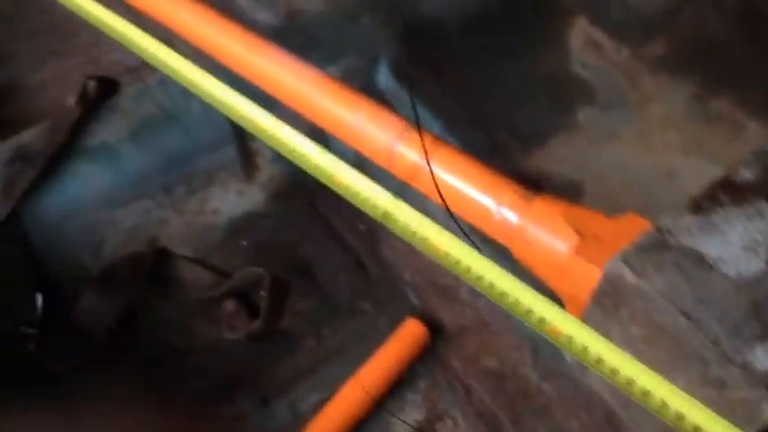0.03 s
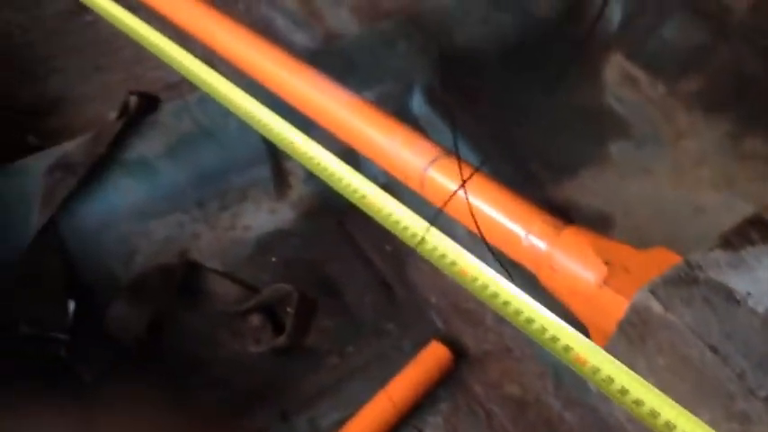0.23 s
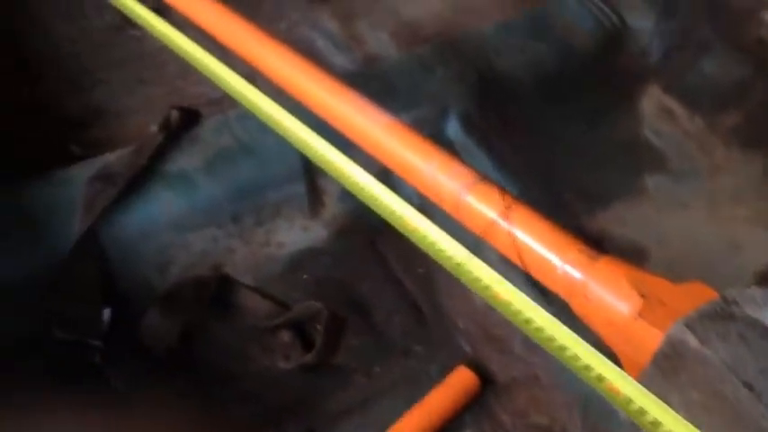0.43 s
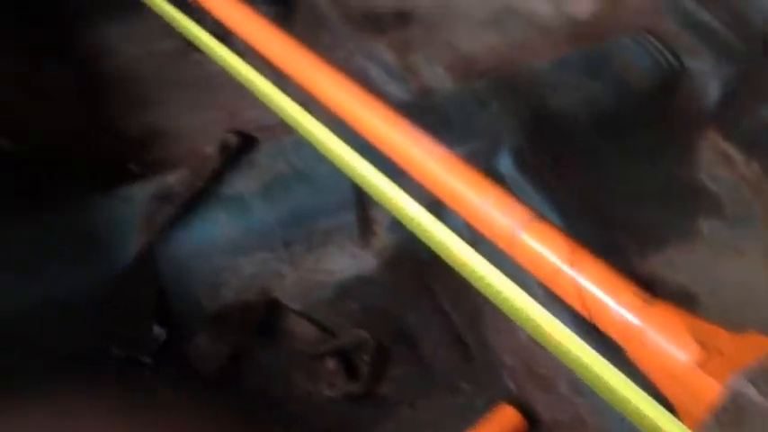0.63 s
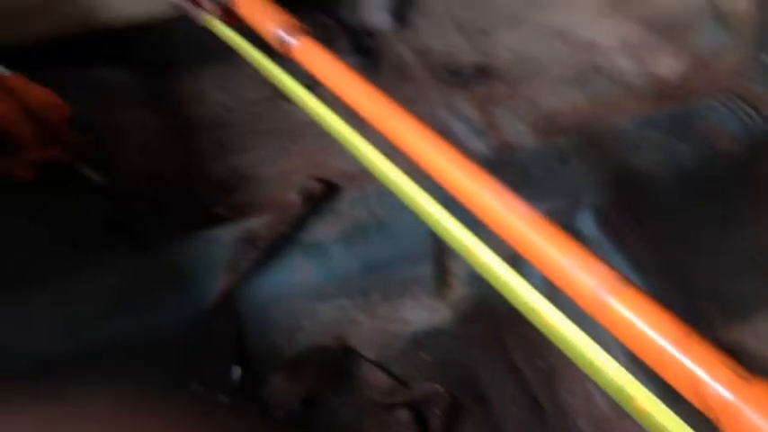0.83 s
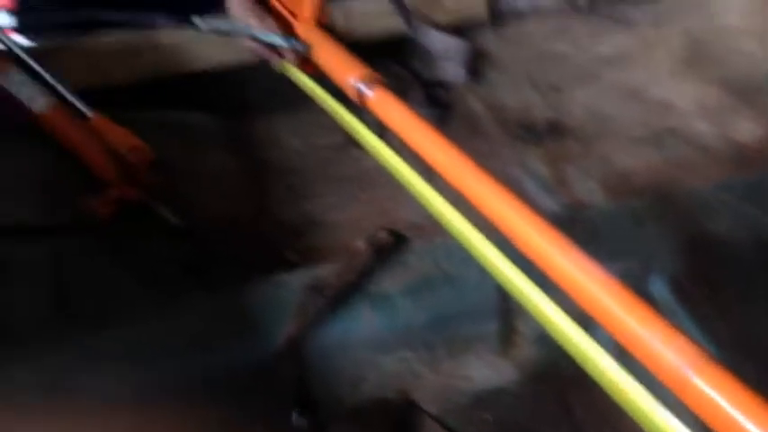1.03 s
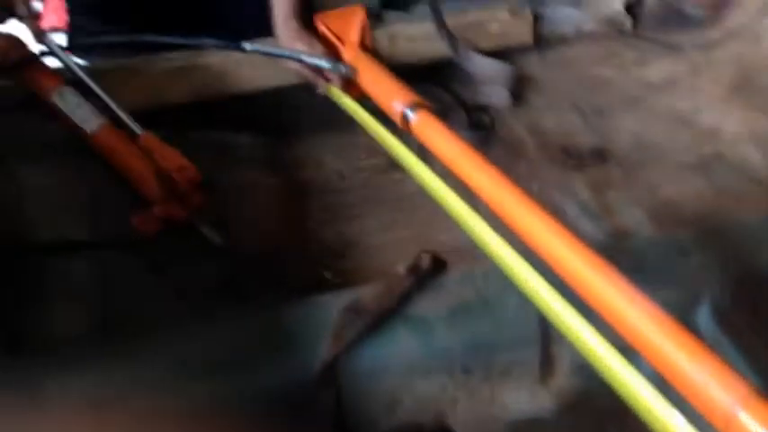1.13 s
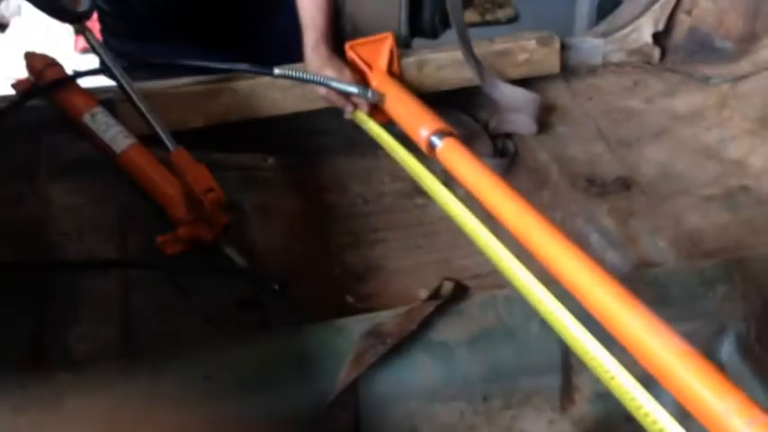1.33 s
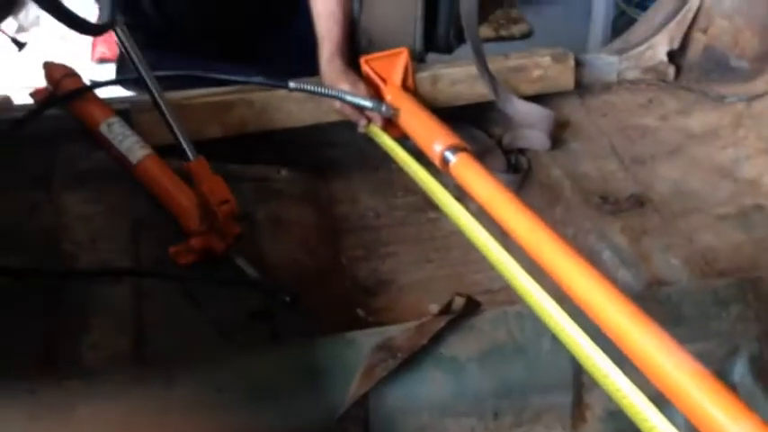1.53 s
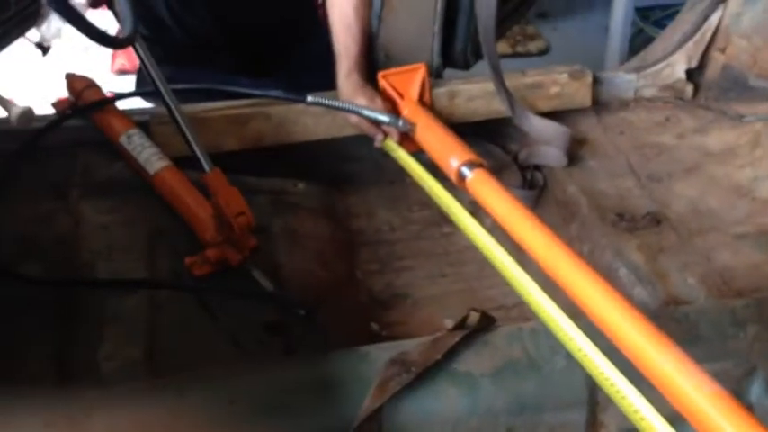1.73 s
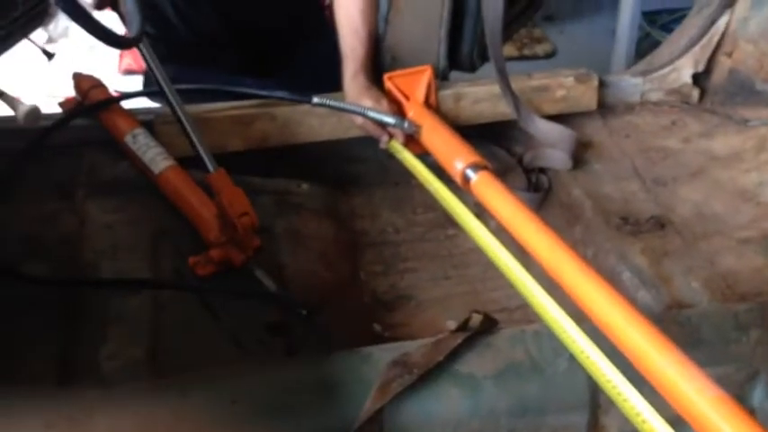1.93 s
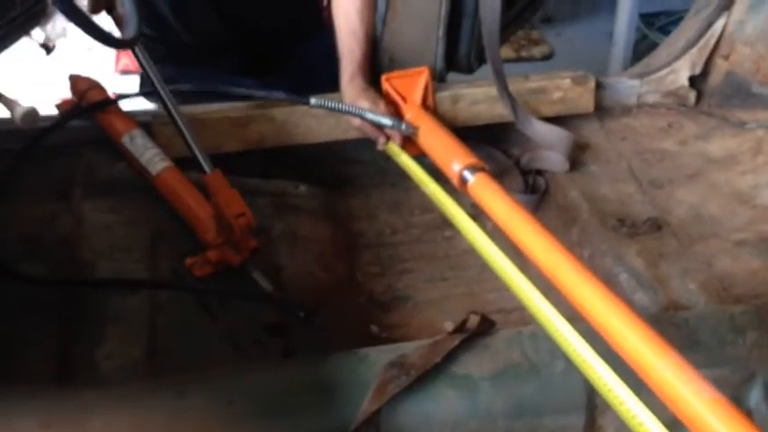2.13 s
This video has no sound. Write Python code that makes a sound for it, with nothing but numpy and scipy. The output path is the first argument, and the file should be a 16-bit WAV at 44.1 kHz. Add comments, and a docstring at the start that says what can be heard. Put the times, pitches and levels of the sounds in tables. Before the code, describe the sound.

A hydraulic jack is worked in a home garage. Soft thuds and scuffs open; at 0.25 s a bright double metal clack lands over a heavy thud. From 0.57 to 0.93 s small dry ticks run quickly, a creak at 0.9 leads to a hard ringing knock at 1.07. Weaker knocks and scuffs follow, with a dull boomy thud at 1.6 and light clatter near 1.8, over low rumble and faint hiss.

```python
"""A hydraulic jack is worked in a home garage, with a tape measure held along its steel ram.
Soft thuds and scuffs of handling open it; then metal clacks over a heavy thud, and small ticks follow.
As the ticks end the ram creaks, then knocks hard against its seat; thuds, scuffs and weaker knocks follow.
Blows ring as decaying tones and noise, scuffs are grainy noise, and the garage answers with a diffuse tail.
A low rumble and a faint hiss lie under it all, heard through a small microphone with little deep bass."""
import sys
import numpy as np
from scipy import signal
from scipy.io import wavfile

SR = 44100
rng = np.random.default_rng(int(sys.argv[2]) if len(sys.argv) > 2 else 0)


def pcm_store(signal):
    """Save signal as 16-bit PCM."""
    levels = np.round(np.clip(np.atleast_2d(signal), -1, 1) * 32767)
    wavfile.write(sys.argv[1], SR, levels.astype(np.int16).T)


N = 95520
T = np.arange(N) / SR  # seconds

# Third-octave bands that shape every noise
BANDS_HZ = 28.4 * 2 ** (np.arange(28) / 3)
HALF_BAND = 2 ** (1 / 6)  # frequency ratio from a band's centre to its edge
BAND_FILTERS = [
    signal.butter(2, [hz / HALF_BAND, hz * HALF_BAND], "band", fs=SR, output="sos")
    for hz in BANDS_HZ
]

# In the tables of ringing and noise, level_db is before the gain of each event or layer.

# Steady background rumble and hiss: centre_hz, band_level_db
FLOOR_COLOUR = [(25, -77), (50, -82), (85, -71.5), (160, -65.5), (300, -87), (550, -84), (1200, -85.5),
                (2500, -81), (5000, -76.5), (10000, -75), (15000, -74)]
# Uneven low rumble of handling, its gain over time: time_s, level_db
RUMBLE_GAIN = [(0, 4), (.2, -2.5), (.4, 2.5), (.52, -19), (.62, -0.5), (.85, -3), (1.03, -4), (1.33, -3),
               (1.52, -10.5), (1.72, 1.5), (1.95, -9), (2.17, -11.5)]
# Colour of that rumble: centre_hz, band_level_db
RUMBLE_COLOUR = [(30, -94), (90, -77.5), (170, -67), (320, -62.5), (600, -85), (1500, -83)]

# Garage reverberation: centre_hz, band_level_db, t60_s
GARAGE_TAIL = [(59, -43, 1), (157, -34.5, 0.52), (370, -29, 0.51), (564, -28.5, 0.15), (830, -27.5, 0.71),
               (1400, -33.5, 0.27), (2200, -27.5, 0.59), (4550, -21.5, 0.35), (8000, -19.5, 0.38),
               (14500, -26, 0.29)]
GARAGE_DELAY_S = .022  # first wall echo: about 7.5 m of extra path
BLOWS_SEND_DB, TICKS_SEND_DB = -7, 3  # levels sent into the garage

# Scuffs of handling: peak_s, rise_s, fall_s, level_db, cutoff_hz
SCUFF_EVENTS = [(0.01, 0.03, 0.014, -2, 3100), (0.233, 0.01, 0.0063, 2, 890),
                (0.912, 0.022, 0.026, -2, 5030), (0.999, 0.0048, 0.0055, -1.5, 6950),
                (1.052, 0.021, 0.03, 2, 1230), (1.214, 0.0049, 0.024, 4, 1100),
                (1.575, 0.012, .014, -5.5, 500), (1.812, 0.022, 0.0086, 0.5, 3470),
                (1.842, 0.01, 0.011, 3.5, 7900), (1.88, 0.013, 0.048, -11.5, 1500),
                (1.981, 0.0032, 0.014, -5.5, 1420)]
# Colour of the rubbing: centre_hz, band_level_db
RUB_COLOUR = [(60, -66.5), (150, -59), (350, -83.5), (650, -64.5), (1000, -66), (1450, -71.5),
              (1900, -88.5), (3000, -68.5), (5500, -68), (9000, -64.5), (15000, -65)]
GRAIN_DEPTH_DB, GRAIN_CUTOFF_HZ = 3.5, 190  # rms depth and fastest flutter of the grain

# Dull thuds: start_s, level_db, contact_cutoff_hz, ring_share (of the full t60), bench_boom_db
THUD_EVENTS = [(0.001, -13.5, 144, 0.51, -8.5), (0.047, -20, 300, 0.35, -15.5),
               (0.121, -21, 600, 0.43, -32), (0.2463, 2, 261, 0.56, -33), (0.27, -8, 333, 0.39, -30),
               (0.308, -13, 450, 0.46, -34), (0.361, -18.5, 225, 0.53, -14.5),
               (0.904, -18.5, 200, 0.69, -17), (0.938, -16.5, 690, 0.35, -27), (1.074, -5, 900, 0.13, -11),
               (1.201, -14, 170, 0.48, -13.5), (1.325, -28, 328, 0.59, -25), (1.609, -2.5, 332, 0.57, 0),
               (1.637, -13, 190, 0.12, -7.5), (1.653, -5, 190, .25, -20), (1.749, -31.5, 142, 0.55, -10),
               (1.83, -29, 139, 0.48, -11), (1.976, -13.5, 168, 0.72, -12)]
# Dense weak modes under a thud, before ring_share: centre_hz, band_level_db, t60_s
THUD_NOISE = [(41, -72, .25), (90, -44, 0.2), (162, -31.5, 0.19), (320, -45.5, 0.34), (586, -47, 0.54),
              (1040, -42, 0.27), (1450, -83, 0.17)]
# Low boom of the bench or floor underneath: pitch_hz, level_db, t60_s
BENCH_RING = [(92.8, -41.5, 0.86), (119, -34, 0.064), (142.65, -35, 0.37)]
THUD_MODES_DB = -1.5  # the body's modes under a thud

# Small dry ticks: start_s, level_db
TICK_EVENTS = [(0.5737, 0), (0.6309, -2.5), (0.6711, -3.5), (0.7048, -5.5), (0.7361, -4), (0.7676, -4),
               (0.7998, -4), (0.8347, -14), (0.8699, -3.5), (0.9246, -4.5), (0.998, -11)]
# Modes of one tick: pitch_hz, level_db, t60_s
TICK_RING = [(1100, -52, .002), (2200, -33.5, .0026), (4100, -52, .003), (6500, -53, .002)]
# Short noise of one tick: centre_hz, band_level_db, t60_s
TICK_NOISE = [(400, -71, 0.036), (1017, -62, 0.047), (1465, -62.5, 0.044), (2140, -56, 0.061),
              (3200, -69, 0.027), (4230, -66, 0.033), (5230, -61.5, 0.022), (6550, -61, 0.039),
              (9050, -62, .025), (13900, -67, 0.016)]
# The direct snap and its reflections from surfaces close by: delay_s, level_db
NEAR_ECHOES = [(0, 0), (.00095, -10), (.0028, -8), (.0046, -12)]

# Bright metal clacks: start_s, level_db, cutoff_hz
CLACK_EVENTS = [(0.2444, 1, 17000), (0.2524, -3.5, 12900), (1.062, -17, 17000), (1.0753, -9.5, 17000),
                (1.153, -15.5, 6800), (1.202, -18, 5500), (1.77, -26.5, 4500), (1.812, -32, 11900),
                (1.837, -26.5, 13000)]
# Modes of the clacking metal: pitch_hz, level_db, t60_s
METAL_RING = [(1256, -51.5, 0.1), (1447, -43.5, 0.14), (2030, -42.5, 0.058), (2990, -50.5, 0.084),
              (4558, -40.5, 0.042), (4780, -60, 0.027), (6180, -58, 0.08), (7680, -49.5, 0.041),
              (8000, -48, .08)]
# Its dense weaker modes: centre_hz, band_level_db, t60_s
METAL_NOISE = [(404, -111, 0.068), (860, -60, .14), (1170, -46.5, 0.15), (1450, -65, 0.077),
               (1740, -44.5, .11), (2280, -43.5, 0.16), (3000, -50.5, 0.13), (3800, -54, 0.18),
               (4580, -41, 0.095), (5770, -56, 0.14), (7270, -46.5, 0.13), (9160, -49.5, 0.12),
               (11500, -54.5, 0.11), (14500, -54, .07)]

# Modes set off by each slip of the creaking seat: pitch_hz, level_db, t60_s
CREAK_RING = [(113, -7, 0.24), (199, -13, 0.16), (410, 0, 0.056), (501, -9.5, 0.23), (587, -4, .1),
              (705.3, 2.5, 0.085), (790, -6, 0.023), (1040, -9, 0.031), (1193, -8, 0.044)]
CREAK_START_S, CREAK_SWELL_S, CREAK_DB = .883, 0.057, -40
SLIPS, SLIPS_PER_S, SLIP_JITTER = 7, 78, 0.068  # jitter as a share of the slip spacing

# Hard knocks: start_s, level_db, contact_cutoff_hz
KNOCK_EVENTS = [(1.068, 0, 14000), (1.201, -20.5, 1100), (1.812, -27, 2500), (1.838, -25.5, 5000),
                (1.976, -34.5, 1500)]
# Ringing of the ram and its seat, shortened by ring_share in thuds: pitch_hz, level_db, t60_s
BODY_RING = [(166, -31, .25), (182, -31, .28), (215, -39, .2), (272, -29, .24), (305, -39, .18),
             (340, -37, .3), (409, -36, .28), (481, -42, .26), (544, -36, .26), (660, -39, .17),
             (694, -39, .22), (787, -46, .25), (868, -40, .3), (955, -43, .28), (997, -44, .27),
             (1165, -42, .2), (1447, -29, .12)]
# Its crowd of weaker modes under a hard blow: centre_hz, band_level_db, t60_s
BODY_NOISE = [(40.3, -46, .3), (90, -43, 0.27), (183, -25, 0.14), (355, -40, 0.37), (700, -39, 0.25),
              (1160, -37.5, 0.19), (1580, -49, 0.33), (2480, -42.5, 0.081), (3600, -60.5, 0.35),
              (4800, -60.5, 0.31), (6940, -66, 0.3), (14000, -56.5, 0.17)]

MIC_BASS_CUT_HZ, TOP_CUT_HZ = 49, 15350


def from_db(db):
    """Decibels to gain."""
    return 10 ** (np.asarray(db) / 20)


def add(out, start_s, sound):
    """Mix a sound in from its start time."""
    i = int(np.clip(start_s * SR, 0, N - 1))
    out[i:i + len(sound)] += sound[:N - i]


def low_pass(x, hz):
    """Second-order treble loss."""
    return signal.sosfilt(signal.butter(2, min(hz, .45 * SR), fs=SR, output="sos"), x)


def bands(table, size):
    """Third-octave noises at the table's levels, each with its centre and the other columns."""
    hz, *columns = np.transpose(table)
    for centre, sos in zip(BANDS_HZ, BAND_FILTERS):
        # A quarter second of run-in lets the filter settle.
        noise = signal.sosfilt(sos, rng.standard_normal(size + SR // 4))[-size:]
        db, *rest = [np.interp(np.log(centre), np.log(hz), column) for column in columns]
        octaves_outside = abs(np.log2(centre / np.clip(centre, hz.min(), hz.max())))
        gain = from_db(db - 14 * octaves_outside)
        yield centre, gain * noise / noise.std(), rest


def coloured(table):
    """Steady noise of a given colour."""
    return sum(noise for _, noise, _ in bands(table, N))


def dying(hz, t60, rise_cycles, size):
    """A ring builds up over its first cycles and dies by 60 dB in t60 seconds."""
    t = T[:size]
    build_up = 1 - np.exp(-t * hz / rise_cycles)
    return build_up * from_db(-60 * t / t60)


def wash(table, size, ring=1, rise_cycles=1.0):
    """Modes too dense to tell apart: noise that dies band by band."""
    return sum(
        noise * dying(hz, t60 * ring, rise_cycles, size)
        for hz, noise, (t60,) in bands(table, size)
    )


def modes(table, size, ring=1, rise_cycles=0.64, flip=-1):
    """Separate decaying tones, varied in level on every blow."""
    out = np.zeros(size)
    for k, (hz, db, t60) in enumerate(table):
        # A flip of -1 opposes neighbouring modes; between 0 and 1 it weakens the later ones.
        gain = flip ** k * from_db(db + rng.normal(0, 1))
        tone = np.sin(2 * np.pi * hz * T[:size])
        out += gain * tone * dying(hz, t60 * ring, rise_cycles, size)
    return out


def background():
    """Steady noise gives rumble and hiss; low noise of varying level gives the handling rumble."""
    rumble_gain = from_db(np.interp(T, *np.transpose(RUMBLE_GAIN)))
    return coloured(FLOOR_COLOUR) + rumble_gain * coloured(RUMBLE_COLOUR)


def garage(x):
    """A diffuse tail, dying band by band, starts after the path to the first wall and back."""
    tail = np.zeros(N)
    add(tail, GARAGE_DELAY_S, wash(GARAGE_TAIL, size=SR) / np.sqrt(SR * GARAGE_DELAY_S))
    return signal.fftconvolve(x, tail)[:N]


def scuffs():
    """Short rubs, noise roughened by a random grain, swell and fade."""
    grain = low_pass(rng.standard_normal(N), GRAIN_CUTOFF_HZ)
    rub = coloured(RUB_COLOUR) * from_db(GRAIN_DEPTH_DB * grain / grain.std())
    out = np.zeros(N)
    for peak_s, rise_s, fall_s, db, cutoff_hz in SCUFF_EVENTS:
        width_s = np.where(T < peak_s, rise_s, fall_s)
        swell = np.exp(-((T - peak_s) / width_s) ** 2 / 2)
        out += from_db(db) * low_pass(rub, cutoff_hz) * swell
    return out


def thuds():
    """Soft contacts pass mostly the body's low modes and set the bench booming."""
    out = np.zeros(N)
    for start_s, db, cutoff_hz, ring, bench_db in THUD_EVENTS:
        tones = modes(BODY_RING, size=SR // 3, ring=ring, rise_cycles=0.4, flip=1)
        noise = wash(THUD_NOISE, size=SR // 3, ring=ring, rise_cycles=0.2)
        body = from_db(THUD_MODES_DB) * tones + noise
        bench = modes(BENCH_RING, size=SR // 2, rise_cycles=0.163, flip=0.92)
        add(out, start_s, from_db(db) * low_pass(body, cutoff_hz))
        add(out, start_s, from_db(bench_db) * bench)
    return out


def ticks():
    """Each tick is one sharp snap, its near reflections and a very short noisy ring."""
    out = np.zeros(N)
    for start_s, db in TICK_EVENTS:
        snap = modes(TICK_RING, size=SR // 16, rise_cycles=0.34)
        for delay_s, echo_db in NEAR_ECHOES:
            add(out, start_s + delay_s, from_db(db + echo_db) * snap)
        add(out, start_s, from_db(db) * wash(TICK_NOISE, size=SR // 16, rise_cycles=0.99))
    return out


def clacks():
    """Metal snaps against metal and rings in bright tones and dense noise."""
    out = np.zeros(N)
    for start_s, db, cutoff_hz in CLACK_EVENTS:
        tones = modes(METAL_RING, size=SR // 4, rise_cycles=1.7)
        noise = wash(METAL_NOISE, size=SR // 4, rise_cycles=3.7)
        add(out, start_s, from_db(db) * low_pass(tones + noise, cutoff_hz))
    return out


def creak():
    """Uneven slips swell and fade as the seat takes the load, each ringing its modes."""
    out = np.zeros(N)
    for k in range(SLIPS):
        slip_s = (k + rng.normal(0, SLIP_JITTER)) / SLIPS_PER_S
        progress = np.clip(slip_s / CREAK_SWELL_S, 0, 1)
        swell = 0.18 + np.sin(np.pi * progress ** 0.36) ** 2  # early peak over a weak floor
        slip = modes(CREAK_RING, size=SR // 4, rise_cycles=1.3, flip=0.96)
        add(out, CREAK_START_S + slip_s, from_db(CREAK_DB) * swell * slip)
    return out


def knocks():
    """A hard blow sets the whole body ringing; the contact limits its treble."""
    out = np.zeros(N)
    for start_s, db, cutoff_hz in KNOCK_EVENTS:
        tones = modes(BODY_RING, size=SR // 2, rise_cycles=1.0)
        noise = wash(BODY_NOISE, size=SR // 2, rise_cycles=0.86)
        add(out, start_s, from_db(db) * low_pass(tones + noise, cutoff_hz))
    return out


def scene():
    """All contacts sound in the garage, over the background."""
    blows = scuffs() + thuds() + clacks() + creak() + knocks()
    ticking = ticks()
    room = garage(from_db(BLOWS_SEND_DB) * blows + from_db(TICKS_SEND_DB) * ticking)
    return (background() + room + ticking + blows)[None]


def record(dry):
    """The small microphone loses the deep bass; the top is cut steeply."""
    bass_cut = signal.butter(2, MIC_BASS_CUT_HZ, "high", fs=SR, output="sos")
    top_cut = signal.ellip(10, .2, 70, TOP_CUT_HZ, fs=SR, output="sos")
    return signal.sosfilt(top_cut, signal.sosfilt(bass_cut, dry))


dry = scene()
out = record(dry)
pcm_store(out)
```